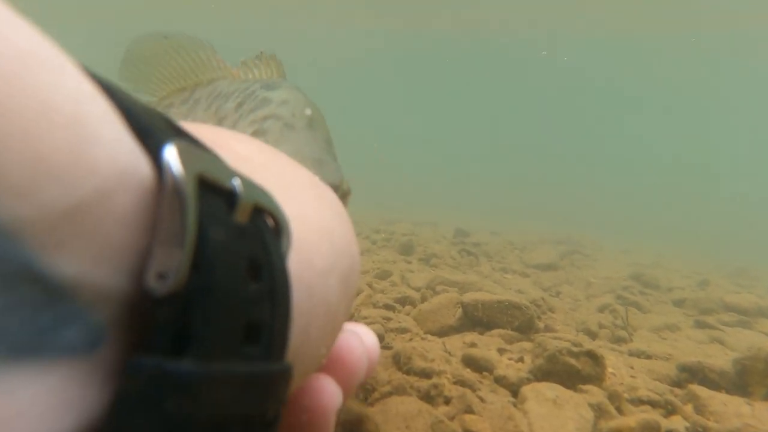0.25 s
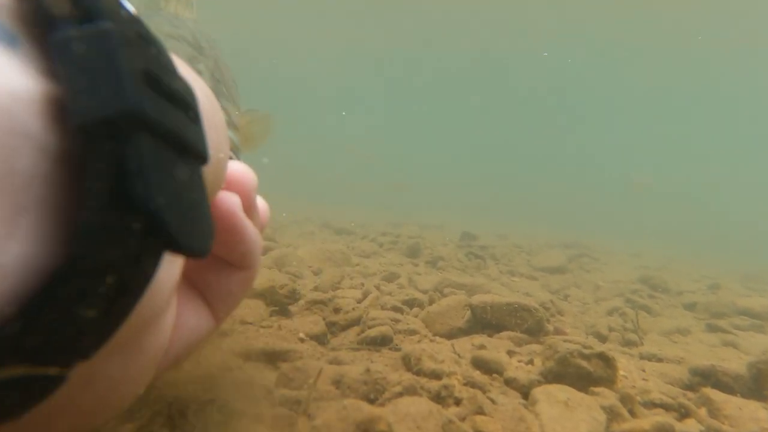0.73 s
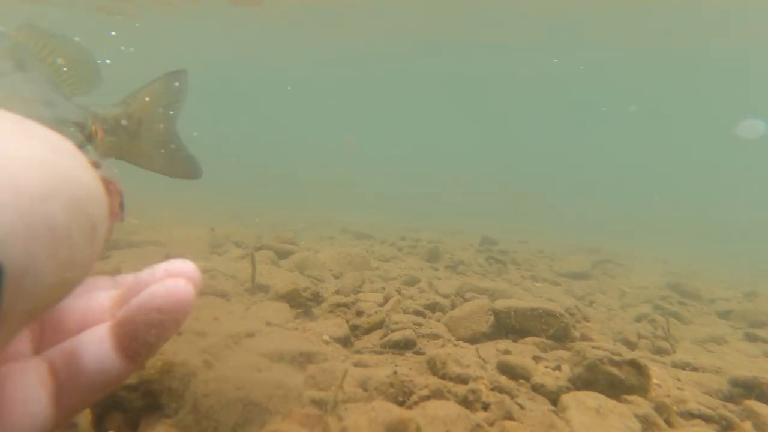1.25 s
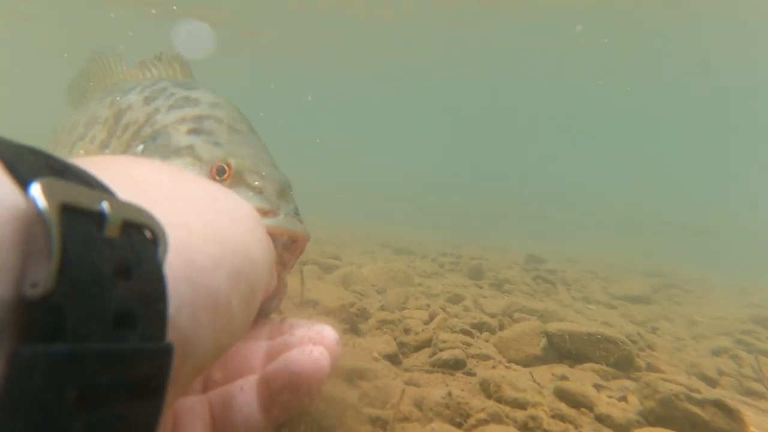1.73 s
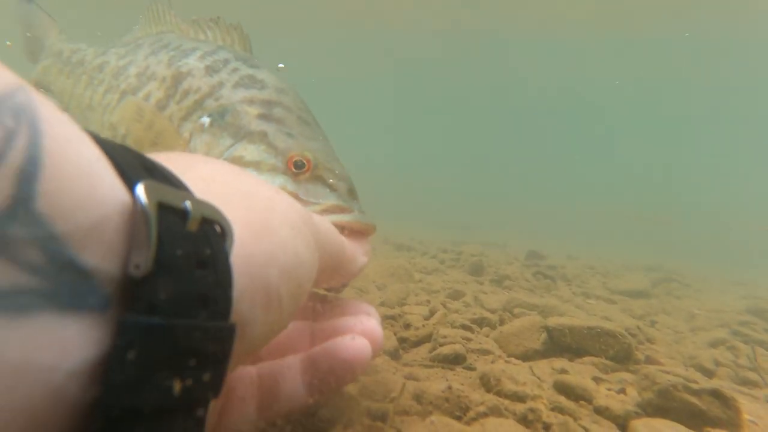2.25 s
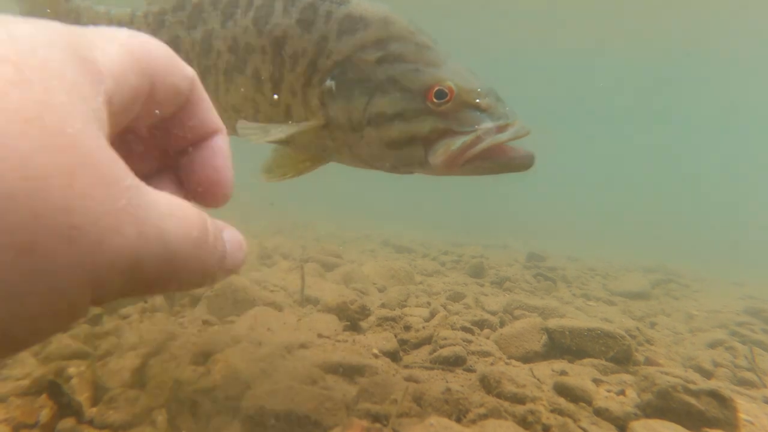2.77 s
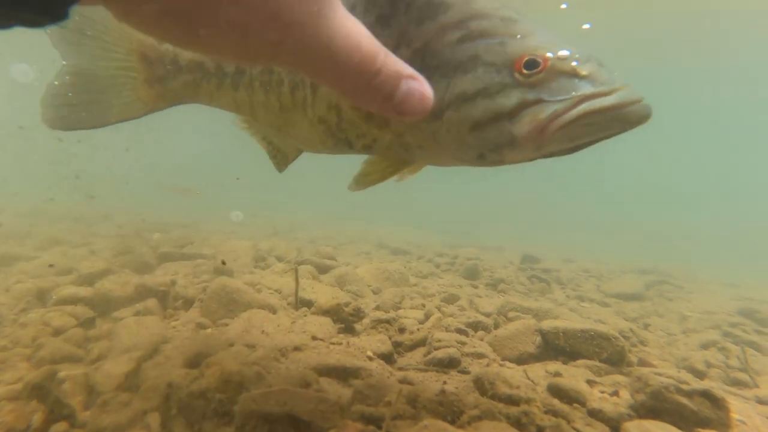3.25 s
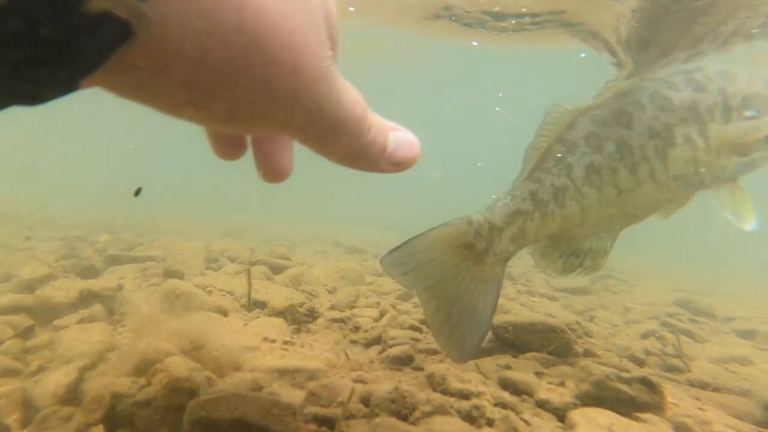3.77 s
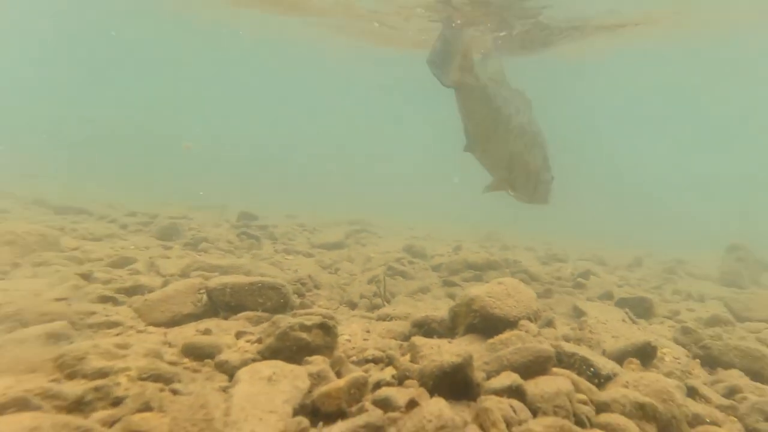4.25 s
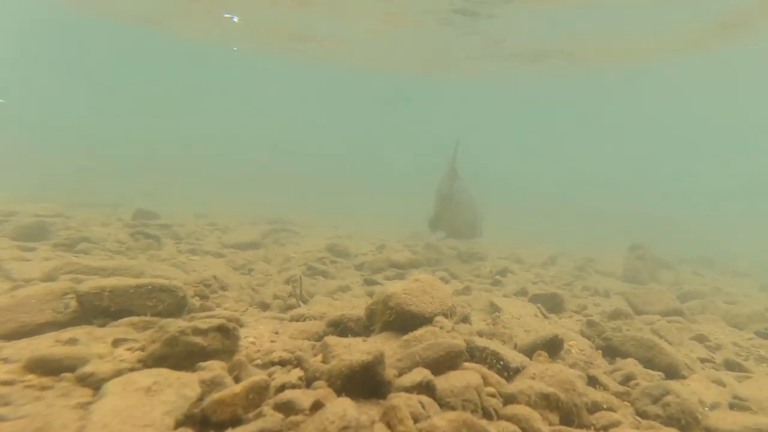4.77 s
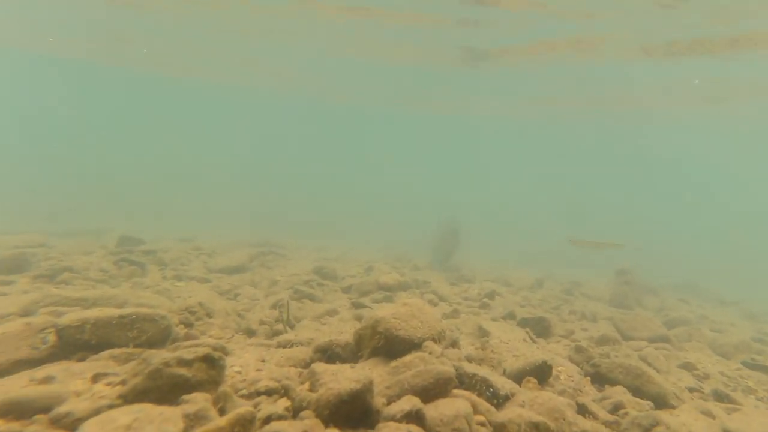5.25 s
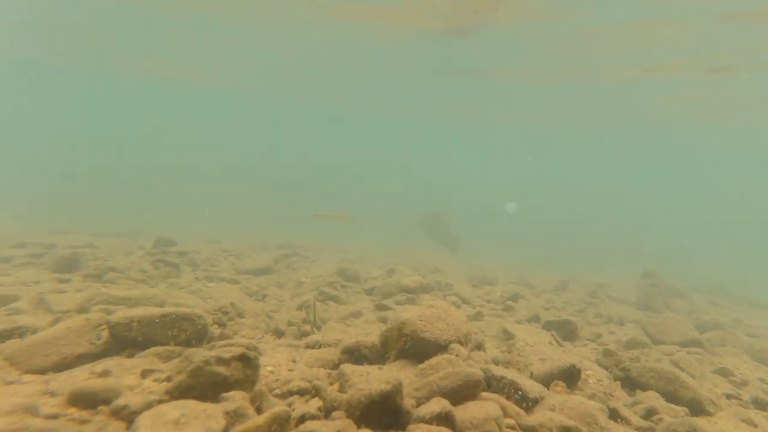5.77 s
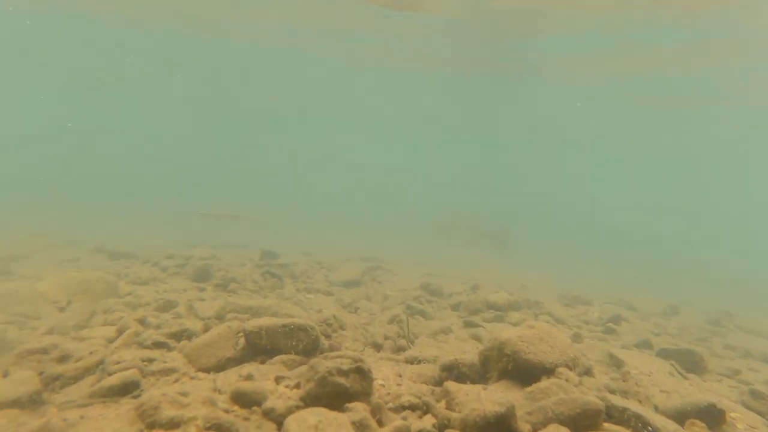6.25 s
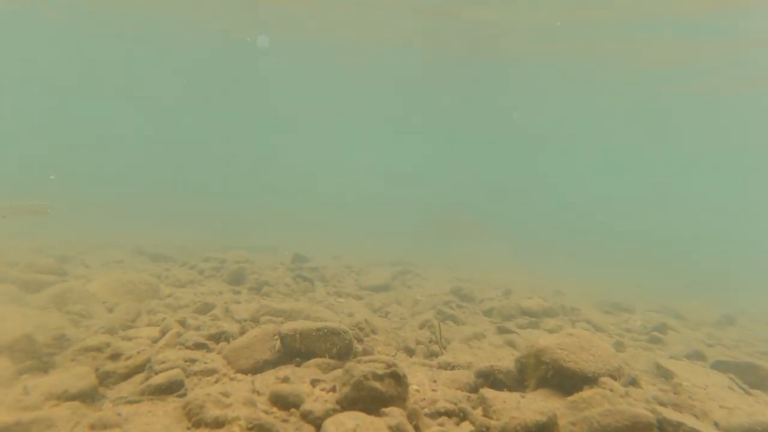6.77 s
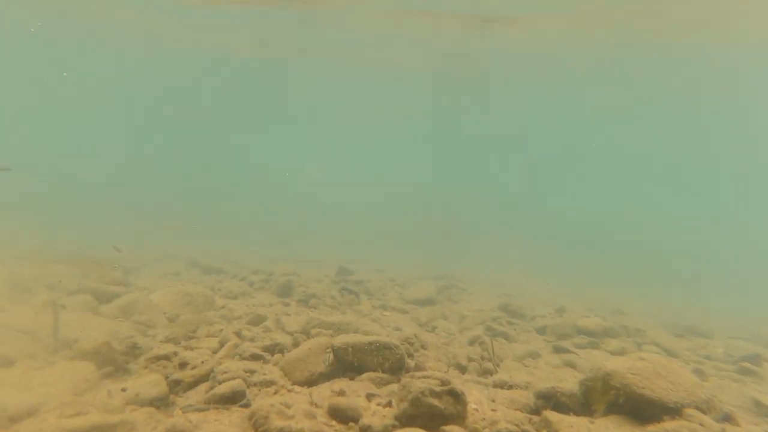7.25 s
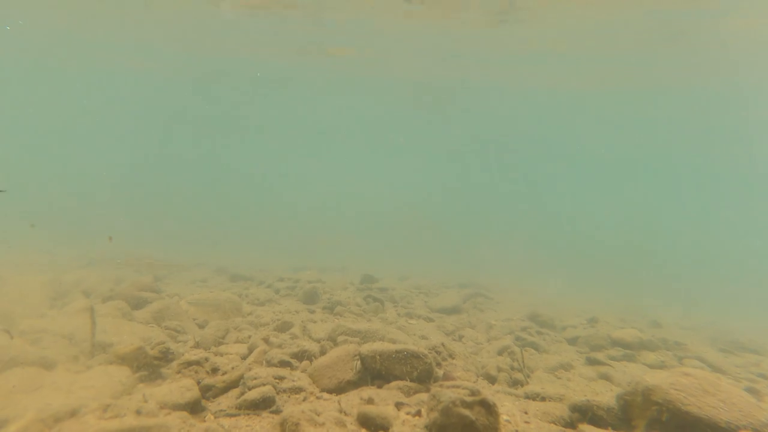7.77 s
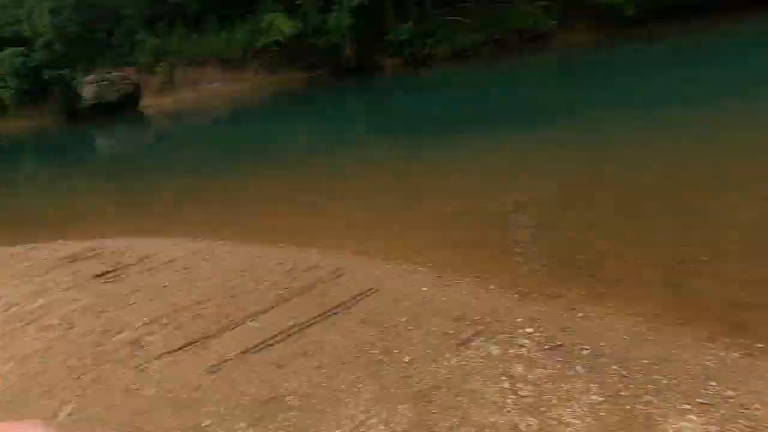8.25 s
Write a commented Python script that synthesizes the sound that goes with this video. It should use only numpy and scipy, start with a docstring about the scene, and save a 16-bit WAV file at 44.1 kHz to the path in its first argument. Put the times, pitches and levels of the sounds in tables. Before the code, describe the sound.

Heard from inside a sealed camera under a shallow river: dull, boxy knocks, gulps and deep sagging glugs over a low current rumble, with little bubble blips and splashes as a hand lets a fish go. The water thins a little, keeps burbling, then stops abruptly. After a brief near-silence comes very soft open-air hiss and a quick cluster of light plastic clacks from a toy water pistol.

```python
"""Eddies, gulps and deep falling glugs of river water knock on a sealed camera as a fish is let go and swims
off. The knocks are pulses, noise and falling tones, muffled by a filter that stands for the camera's housing.
Low noise makes the current rumble, bubbles are short sagging tones, and splashes and grit are bursts of noise.
The underwater scene ends with an abrupt cut. After a short gap comes the open riverbank, a soft hiss of
filtered noise, with a few clacks of a plastic water pistol: bursts of noise and ringing body tones."""
import sys
import numpy as np
from scipy import signal
from scipy.fft import rfft, irfft
from scipy.io import wavfile
from scipy.ndimage import uniform_filter1d, minimum_filter1d

SR = 44100
rng = np.random.default_rng(int(sys.argv[2]) if len(sys.argv) > 2 else 0)


def put_to_file(sound):
    """Save the sound as 16-bit audio at rate SR, in the file named by the first command-line argument."""
    columns = np.atleast_2d(sound).T  # one column per channel
    safe = np.clip(columns, -1, 1)
    whole_steps = np.round(safe * 32767)
    wavfile.write(sys.argv[1], SR, whole_steps.astype(np.int16))


N = 375026
T = np.arange(N) / SR  # time of every sample, in seconds

# what the housing lets through of near blows: pitch_hz [Hz], level_db [dB]
HOUSING = [(60, -5), (120, -4.5), (220, -6.5), (420, -8), (560, -5), (650, -8), (740, -20.5), (1000, -30),
           (1350, -42), (1700, -50.5), (2300, -65), (2900, -75), (3400, -76), (9000, -92)]
# the note on which the housing itself rings most
HOUSING_MODE_HZ, HOUSING_MODE_WIDTH_HZ = 618.6, 17
# surges of water round the housing: start_s [s], length_s [s], churn_db [dB], pressure_swing_db [dB]
SURGES = [(0.032, 0.13, -28, -32), (0.445, 0.18, -25.5, -15.5), (0.552, 0.11, -22, -18),
          (1.029, 0.043, -19.5, -37.5), (1.337, 0.21, -16.5, -14), (1.602, 0.15, -33.5, -17.5),
          (2.297, 0.16, -31.5, -23), (2.97, 0.055, -20, -21.5), (3.104, 0.25, -23, -31),
          (3.51, 0.051, -24.5, -19), (3.658, 0.04, -21.5, -17), (3.877, 0.18, -16.5, -14.5),
          (4.091, 0.43, -20, -15.5), (4.522, 0.23, -21.5, -16.5), (4.887, 0.085, -20, -23),
          (5.062, 0.053, -23, -14), (5.164, 0.066, -21.5, -19.5), (5.948, 0.17, -24.5, -22),
          (6.245, 0.2, -21, -17), (6.802, 0.029, -24.5, -13.5), (7.033, 0.091, -21.5, -14),
          (7.187, 0.037, -22, -31.5), (7.622, 0.031, -22, -14), (7.886, 0.28, -28, -23.5)]


def undb(db):
    """Turn decibels into a gain."""
    return 10 ** (np.asarray(db) / 20)


def unit(x):
    """Scale to an average (rms) strength of 1."""
    return x / np.sqrt(np.mean(x ** 2))


def curve(table):
    """Join the (time, value) points of a table with straight lines, one value per sample."""
    return np.interp(T, *np.transpose(table))


def colour(x, points, bass_db=0, size=4096):
    """Filter sound through (Hz, dB) points without any echo ahead of it; bass_db lifts or cuts the bass."""
    point_hz, point_db = np.transpose(points)
    hz = np.maximum(np.arange(size // 2 + 1) * SR / size, 1)
    bass_shelf_db = bass_db / (1 + (hz / 400) ** 4)
    gain = undb(np.interp(np.log(hz), np.log(point_hz), point_db) + bass_shelf_db)
    # folding the cepstrum gives a minimum-phase filter, which answers as early as it can
    cepstrum = irfft(np.log(gain))
    cepstrum[1:size // 2] *= 2
    cepstrum[size // 2 + 1:] = 0
    response = irfft(np.exp(rfft(cepstrum)))
    return signal.fftconvolve(x, response)[:len(x)]


def band(x, hz, width_hz):
    """Pass sound through one resonance."""
    return signal.lfilter(*signal.iirpeak(hz, hz / width_hz, fs=SR), x)


def housing_mode(x):
    """The housing's main note, as rung by x."""
    return band(x, HOUSING_MODE_HZ, HOUSING_MODE_WIDTH_HZ)


def soften(x, top_hz):
    """Gently take away the treble above top_hz."""
    return signal.sosfilt(signal.butter(2, top_hz, fs=SR, output="sos"), x)


def walk(rate):
    """Wander at random with a spread near 1, through `rate` new values a second."""
    knots = rng.standard_normal(4096)
    return 1.12 * np.interp(T * rate, np.arange(len(knots)), knots)


def pulses(rate, spread_db):
    """Random pressure pulses, about `rate` a second, of either sign and uneven size."""
    happens = rng.random(N) < rate / SR
    sign = rng.choice([-1, 1], N)
    size_db = spread_db * np.clip(rng.standard_normal(N), -2, 2)
    return happens * sign * undb(size_db)


def add(out, s, x):
    """Mix x in from time s."""
    i = max(int(s * SR), 0)
    out[i:i + len(x)] += x[:max(N - i, 0)]


def centred_time(size, share_before):
    """Times in seconds for one short event, with 0 at its heart."""
    return (np.arange(size) - size // share_before) / SR


def decay(t, t60):
    """Die away by 60 dB in t60 seconds."""
    return np.exp(-np.log(1000) * t / t60)


def surges(levels_db, attack_s, release_s):
    """Summed power of the surges: each rises, holds and dies away."""
    power = np.zeros(N)
    for (start, length, _, _), db in zip(SURGES, levels_db):
        rise = np.clip((T - start) / attack_s + .5, 0, 1)
        fall = np.exp(-np.clip((T - start - length) / release_s + .5, 0, 20))
        power += (undb(db) * rise * fall) ** 2
    return power


def churning():
    """How hard the water churns, in dB: surges on top of the calm current, never quite even."""
    # the current between surges: time_s [s], level_db [dB]
    calm = [(0, -27.5), (.8, -31.5), (1.25, -31.5), (2.1, -25), (2.8, -30.5), (3.8, -32), (4.7, -28),
            (5.6, -32), (6.3, -24), (6.7, -30), (7.5, -32.5), (8, -35.5)]
    surge_levels_db = [churn_db for _, _, churn_db, _ in SURGES]
    power = undb(curve(calm)) ** 2 + surges(surge_levels_db, attack_s=0.03, release_s=0.069)
    wander_db = 1.1 * walk(rate=18)
    return 10 * np.log10(power) + wander_db


def falling_tone(t, octave_s, tail_s):
    """Opening water builds near the housing's note, then each cycle is longer than the last, down into the bass."""
    heart_hz, rise_s, hiss_db = 451.5, .004, -10
    pitch_spread = .12  # tones differ a little in pitch
    stretch = np.maximum(1 + t / octave_s, heart_hz / HOUSING_MODE_HZ)  # 2 is one octave down
    hz = heart_hz * np.exp(pitch_spread * rng.uniform(-1, 1)) / stretch
    swell = np.exp(-np.where(t < 0, -t / rise_s, t / tail_s)) / np.maximum(stretch, 1) ** 0.45
    tone = np.sin(2 * np.pi * (np.cumsum(hz) / SR + rng.random()))
    hiss = unit(colour(rng.standard_normal(len(t)), HOUSING)) * undb(hiss_db) / stretch
    end_fade = np.minimum(2 * (1 - t / t[-1]), 1)
    return colour((tone + hiss) * swell * end_fade, HOUSING)


def burble(count=4, size=4096):
    """Small glugs at random moments, some falling quickly and some slowly."""
    t = centred_time(size, share_before=4)
    total = np.zeros(N)
    for octave_s in np.geomspace(.003, .01, count):
        glug = falling_tone(t, octave_s, tail_s=0.016)
        total += signal.fftconvolve(pulses(rate=18, spread_db=2.5), glug, "same")
    return unit(total)


def current(churn_db):
    """Slow pressure swings rock the housing; eddies patter and glug on it over the wash of the river."""
    # colour of the current's rumble: pitch_hz [Hz], level_db [dB]
    rumble_colour = [(8, -1), (22, 3.5), (45, 1), (59, 11), (75, 3.5), (110, 1.5), (180, -14.5), (400, -68)]
    # what the housing lets through of the river's far wash: pitch_hz [Hz], level_db [dB]
    wash_colour = [(120, -8.5), (220, -9.5), (400, -11.5), (570, -1), (650, -6.5), (740, -16.5),
                   (1050, -27), (1350, -45.5), (1700, -38), (2200, -47.5), (2850, -64.5), (3300, -66),
                   (6000, -94.5), (14000, -90.5)]
    # how each layer grows with the churn: dB per dB of churn, then an offset in dB
    eddy_law, wash_law = (1.079, 0.24), (0.47, -20.5)
    calm_swing_db, rumble_db, burble_db = -23, -4.5, -3

    swing_levels_db = [swing_db for _, _, _, swing_db in SURGES]
    swing_power = surges(swing_levels_db, attack_s=0.028, release_s=0.056)
    swing = np.sqrt(undb(calm_swing_db) ** 2 + swing_power)
    rumble = unit(colour(rng.standard_normal(N), rumble_colour)) * swing * undb(rumble_db)

    patter = pulses(rate=900, spread_db=3.5) * undb(2.2 * walk(70))
    eddies = unit(colour(patter, HOUSING)) + undb(burble_db) * burble()

    # the far wash swells less than the eddies close by, and keeps the housing's main mode ringing
    wash = unit(colour(rng.standard_normal(N) * undb(3.4 * walk(35)), wash_colour, bass_db=-4.0))
    wash = wash + undb(-1.0) * housing_mode(wash)

    eddies = eddies * undb(np.polyval(eddy_law, churn_db))
    wash = wash * undb(np.polyval(wash_law, churn_db))
    return soften(rumble + eddies + wash, top_hz=3630)


def bubble(hz, t60, sharp):
    """One bubble rings, starting sharp and sagging as it settles."""
    t = T[:int(2 * t60 * SR)]
    phase = 2 * np.pi * np.cumsum(hz * (1 + sharp * np.exp(-t / 0.008))) / SR
    attack = (1 - np.exp(-t / 0.00097)) ** 2
    return np.sin(phase) * attack * decay(t, t60)


def bubbles(churn_db, count=900):
    """Single bubbles and clouds of `count` a second ring; crowds of tiny ones fizz behind as the water churns."""
    # colour of the fizz: pitch_hz [Hz], level_db [dB]
    fizz_colour = [(700, -24), (1100, 2.5), (1380, 4.5), (1700, -14), (2100, -21.5), (2700, -26.5),
                   (3300, -39.5), (6000, -69)]
    # the tiniest bubbles, before a 2 dB cut: time_s [s], level_db [dB]
    sizzle_level = [(0, -66.5), (1.1, -89), (1.8, -83), (2.1, -67), (2.45, -80), (3.8, -77.5), (4.4, -65),
                    (5.15, -66.5), (5.5, -75), (6.15, -66.5), (6.7, -79), (8, -76.5)]
    # their colour: pitch_hz [Hz], level_db [dB]
    sizzle_colour = [(1400, -23), (2000, -4), (2850, 0.5), (3300, -22.5), (4500, -18.5), (6000, -35.5)]
    # single bubbles, level before attack and decay: start_s [s], level_db [dB], settled pitch_hz [Hz],
    # t60_s (time to die by 60 dB) [s], starting sharpness [share of the pitch]
    single_bubbles = [(0.535, -20, 1140, 0.0039, .16), (1.761, -10, 1010, 0.0095, 0.1),
                      (1.907, -22.5, 1280, 0.021, .044), (2.021, -12.5, 1270, 0.013, 0.041),
                      (2.159, -11.5, 1290, 0.014, .05), (2.194, -13, 1090, 0.015, 0.058),
                      (2.338, -14.5, 1295, 0.03, .03), (3.391, -29, 1443, 0.054, 0.035),
                      (3.399, -24, 1337, 0.02, 0.1), (3.404, -3, 1094, 0.03, 0.092),
                      (3.415, -22.5, 1053, 0.11, .04), (3.410, -27.5, 2500, 0.022, 0.017),
                      (3.431, -45, 2580, 0.018, .02), (3.474, -18.5, 995, 0.15, 0.0054),
                      (3.49, -25.5, 1370, 0.038, .02), (3.491, -35, 1760, 0.029, 0.016),
                      (3.505, -50, 2510, .04, .018), (3.505, -23.5, 1006, .04, .01),
                      (5.318, -23, 1390, 0.014, 0.089), (5.319, -28, 2560, 0.0066, .08),
                      (5.667, -29, 1400, 0.011, .03), (5.669, -28, 2430, 0.0073, .08)]
    # clouds shaken loose, whose bubbles are 4.6 to 13.8 dB above the level:
    # start_s [s], end_s [s], level_db [dB]
    clouds = [(1.37, 1.5, -39), (1.88, 1.925, -28.5), (1.95, 2.2, -35), (2.3, 2.44, -45)]
    cloud_low_hz, cloud_high_hz = 1015, 1350
    fizz_law = (0.58, -39)  # dB per dB of churn, offset in dB

    fizz_db = np.polyval(fizz_law, churn_db) + 1.5 * walk(rate=57)
    out = unit(colour(pulses(rate=530, spread_db=4.0), fizz_colour)) * undb(fizz_db)
    sizzle = unit(colour(pulses(rate=420, spread_db=4.5), sizzle_colour))
    out += sizzle * undb(curve(sizzle_level) - 2.0)
    for s, db, hz, t60, sharp in single_bubbles:
        add(out, s, undb(db) * bubble(hz, t60, sharp))
    for start, end, db in clouds:
        for when, pitch, strength in rng.random((int(count * (end - start)), 3)):
            hz = cloud_low_hz + pitch * (cloud_high_hz - cloud_low_hz)
            ping = bubble(hz, t60=0.007, sharp=0.035)
            add(out, start + when * (end - start), ping * undb(db + 9.2 * (strength + 0.5)))
    return out


def gulps(size=4096):
    """Each gulp is a slap and falling tone, as its pocket of water opens, inside a swell of smaller pulses."""
    # gulps against the housing, level before a 12 dB cut:
    # time_s [s], level_db [dB], length_s [s], bass_db [dB]
    gulp_events = [(.025, -13, .007, 4), (.125, -12, 0.015, 6.5), (.273, -18.5, 0.0055, -4),
                   (.324, -13, 0.0041, 1), (.379, -7, 0.0096, 6.5), (.546, -8, 0.014, 2),
                   (.614, -14, 0.015, 6), (.67, -11, .0058, 10), (.736, -11.5, 0.0034, 4.5),
                   (.797, -20, 0.0024, 6), (.981, -13, 0.0097, 14), (1.033, -15, 0.0054, 2),
                   (1.202, -9, 0.0096, -5), (1.239, -19, 0.0058, 6), (1.385, -11, 0.01, -5),
                   (1.523, -9, .0071, 8.5), (1.687, -8, 0.018, 2), (1.772, -7, 0.019, 12.5),
                   (2.138, -15.5, 0.003, 4), (2.254, -8, 0.006, 4.5), (2.307, -11.5, .0076, 5),
                   (2.328, -16, .006, 10), (2.39, -15.5, 0.014, -6), (2.555, -9.5, 0.009, 0.5),
                   (2.94, -17.5, 0.0074, 1), (3.009, -12, 0.0048, -3), (3.041, -14.5, 0.0063, 3),
                   (3.112, -16, 0.0074, 7), (3.16, -15.5, 0.0078, 24), (3.18, -7.5, 0.0062, 13),
                   (3.253, -10, 0.0069, 10), (3.314, -11, 0.0054, 2.5), (3.331, -10.5, 0.0066, 14),
                   (3.408, -9.5, 0.0035, 1), (3.623, -12, 0.0055, 8), (3.651, -11, 0.0044, -2),
                   (3.685, -10.5, 0.0022, 6.5), (3.714, -3.5, 0.013, 2), (3.92, -13, .013, 0.5),
                   (3.966, -11, 0.011, 8), (4.029, -14.5, 0.0073, -2), (4.055, -9, 0.0069, 4),
                   (4.18, -13, 0.0061, 1.5), (4.247, -11, 0.0061, 0), (4.345, -13.5, 0.0076, -10),
                   (4.548, -9, 0.018, 5), (4.735, -12.5, 0.024, 2.5), (4.943, -15.5, 0.0067, 10),
                   (4.967, -16.5, 0.0039, -6), (5.214, -23, .01, 0), (5.74, -20, 0.0031, -13),
                   (5.936, -14.5, 0.0076, -1), (6.045, -20.5, 0.006, -11), (6.243, -14, 0.012, -11),
                   (6.272, -13.5, 0.0055, -15), (6.349, -12.5, 0.012, -4.5), (6.433, -9, .0063, -4),
                   (6.488, -12.5, 0.0051, 7), (6.522, -9.5, 0.0073, -4), (6.647, -12, 0.012, -10.5),
                   (6.702, -17.5, 0.0059, -4), (6.769, -19.5, 0.011, -25), (7, -17, 0.014, -14),
                   (7.049, -10, 0.0083, 2), (7.08, -10, 0.019, -1), (7.248, -11.5, 0.011, -4),
                   (7.269, -14.5, 0.0064, 2), (7.327, -15.5, 0.0037, -7), (7.54, -17, 0.018, -6),
                   (7.659, -11.5, 0.014, -1.5), (7.939, -10, 0.0062, -9.5), (8, -17.5, .004, -6.5)]
    fall_share, slap_share, ring_db = 0.56, .55, -1.5
    out, t = np.zeros(N), centred_time(size, share_before=4)
    fade = np.clip((t[-1] - t) / .02, 0, 1) ** 2
    for s, db, length, bass_db in gulp_events:
        envelope = np.exp(-np.where(t < 0, (t / (1.1 * length)) ** 2, t / (0.9 * length)))
        swell = rng.standard_normal(size) * envelope
        fall = falling_tone(t, octave_s=0.9 * length, tail_s=0.72 * length)
        push = swell / np.linalg.norm(swell)
        push[size // 4] += slap_share * rng.choice([-1, 1])  # the slap at its heart
        knock = colour(push, HOUSING, bass_db=bass_db)
        knock = knock + undb(ring_db) * housing_mode(knock)
        # a gulp with little bass is mostly knock and has little falling tone
        gulp = unit(knock) + fall_share * undb(min(bass_db, 0)) * unit(fall)
        add(out, s + t[0] - .0025, unit(gulp * fade) * undb(db - 12.0))
    return out


def bursts(events, points, size=4096):
    """Short swells of tiny impacts, made of spiky (cubed) noise that builds and dies away."""
    out, t = np.zeros(N), centred_time(size, share_before=4)
    for s, db, length in events:
        swell = np.exp(-np.where(t < 0, (t / length) ** 2, t / length))
        burst = colour(rng.standard_normal(size) ** 3 * swell, points)
        add(out, s + t[0], undb(db) * burst / np.abs(burst).max())
    return out


def grit():
    """Grit brushes the housing in faint bursts of tiny impacts."""
    # brushes of grit: time_s [s], peak_db [dB], length_s [s]
    brushes = [(.322, -62, .005), (.38, -57.5, 0.01), (.539, -60, .0056), (.735, -56, 0.0035),
               (.826, -55, 0.0082), (1.381, -58.5, .008), (1.5, -55.5, .012), (1.56, -53, .005),
               (1.69, -53.5, .008), (2.253, -56, .005), (3.33, -50.5, .007), (3.682, -51.5, .004),
               (3.712, -52, .0033), (3.756, -56, .007), (4.246, -57, 0.0038), (4.282, -55, .0074),
               (4.368, -54.5, .0089), (6.52, -55, .005), (6.836, -51.5, .0083), (7.265, -60, 0.0036)]
    # their colour: pitch_hz [Hz], level_db [dB]
    grit_colour = [(800, -10), (1500, 0.5), (2600, 3.5), (4300, -4.5), (6500, -13.5), (10000, -18),
                   (15000, -30.5)]
    return bursts(brushes, grit_colour)


def glugs(size=6144):
    """Deep glugs, pockets of water that open wide: each is one long falling tone."""
    # time_s [s], peak_db [dB], octave_s (time to fall an octave) [s], tail_s [s]
    glug_events = [(.398, -6.5, .006, .016), (.823, -8.5, 0.013, 0.013), (1.202, -6, 0.0063, .03),
                   (1.565, -8, 0.0066, .016), (1.744, -12.5, 0.0037, 0.035), (1.866, -11, 0.0087, 0.013),
                   (2.398, -10.5, 0.0052, 0.045), (2.626, -9.5, 0.0048, .018), (2.99, -9.5, 0.0026, 0.047),
                   (3.752, -7.5, 0.0064, 0.011), (3.903, -10.5, 0.0065, 0.06), (4.08, -8, 0.0034, 0.073),
                   (4.284, -6.5, 0.0027, .015), (4.35, -14, 0.0052, .035), (4.612, -8, 0.0039, 0.036),
                   (4.703, -12, 0.014, 0.11), (5.945, -9.5, .006, .05), (6.834, -8, 0.0034, 0.036),
                   (7.943, -19, 0.0055, .045)]
    out, t = np.zeros(N), centred_time(size, share_before=6)
    for s, db, octave_s, tail_s in glug_events:
        tone = falling_tone(t, octave_s, tail_s)
        add(out, s + t[0] - .001, undb(db) * tone / np.abs(tone).max())
    return out


def splashes():
    """Sharp little splashes, each a burst of noise for bubbles torn off at once."""
    # time_s [s], peak_db [dB], length_s [s]
    splash_events = [(.537, -24, 0.0018), (.615, -41.5, 0.0093), (1.437, -26, 0.01), (1.56, -43.5, 0.0037),
                     (2.022, -29.5, 0.0018), (2.138, -35, 0.0019), (2.161, -25.5, 0.0012),
                     (2.39, -30, 0.0028), (2.623, -30, 0.0039), (3.404, -19.5, .002),
                     (3.623, -27.5, 0.0041), (3.682, -21, 0.0023), (3.861, -29, 0.0044),
                     (3.904, -35.5, 0.0061), (4.035, -25, .004), (4.245, -24, 0.003),
                     (4.282, -28.5, 0.0024), (4.54, -33, 0.011), (4.705, -34, 0.0083), (4.737, -30, 0.0026),
                     (4.912, -33.5, .008), (4.962, -38, .003), (5.943, -25.5, 0.0029),
                     (6.041, -37.5, 0.0043), (6.268, -26, 0.0031), (6.393, -27.5, .004),
                     (6.423, -35.5, 0.0032), (7.24, -29, 0.0045), (7.997, -32.5, .003)]
    # their colour: pitch_hz [Hz], level_db [dB]
    splash_colour = [(400, -19), (900, 9.5), (1350, 4.5), (1800, -8), (2400, -19), (3000, -29),
                     (5000, -55.5)]
    return bursts(splash_events, splash_colour)


def riverbank():
    """Soft open-air hiss fades in; each clack of the pistol rings the body modes near its own pitch."""
    # colour of the open air: pitch_hz [Hz], level_db [dB]
    air_colour = [(40, 3), (120, -3), (280, 3), (1500, -9), (3000, -17), (5300, -18), (7500, -32),
                  (10000, -39), (14000, -53.5)]
    # modes of the pistol's hollow body: pitch_hz [Hz], level_db [dB], t60_s (time to die by 60 dB) [s]
    pistol_modes = [(305, -0.5, 0.11), (850, -18, 0.2), (1144, -11, .07), (2010, -6, 0.043),
                    (2450, -13, 0.051), (2900, -19, 0.032), (3460, -9, 0.034), (3820, -11, 0.041)]
    # plastic clacks: start_s [s], peak_db [dB], centre_hz [Hz], width_hz [Hz], t60_s [s]
    clacks = [(8.374, -40, 3380, 700, 0.038), (8.416, -45, 1970, 500, .17), (8.431, -25, 1600, 1000, 0.068),
              (8.425, -42, 3780, 1500, 0.29), (8.443, -24.5, 3820, 2750, 0.037),
              (8.458, -26, 603, 820, 0.25), (8.46, -47, 6000, 6000, 0.12), (8.479, -34.5, 2600, 1800, 0.24),
              (8.497, -37, 5470, 3500, .04)]

    fade_in = np.clip((T - 8.25) / 0.051, 0, 1) ** 2
    out = unit(colour(rng.standard_normal(N), air_colour)) * undb(-52.5) * fade_in
    t = T[:SR // 4]
    ring = sum(undb(db) * np.sin(2 * np.pi * hz * t) * decay(t, t60) for hz, db, t60 in pistol_modes)
    attack = 1 - np.exp(-t / 0.00026)
    for s, db, hz, width_hz, t60 in clacks:
        crack = rng.standard_normal(len(t)) * decay(t, t60)
        clack = band((crack + ring) * attack, hz, width_hz)
        clack = soften(band(clack, hz, width_hz), top_hz=12400)
        add(out, s, undb(db) * clack / np.abs(clack).max())
    return out


def scene():
    """Under water first, then on the bank."""
    submerged = T < 8.043  # seconds
    churn_db = churning()
    water = current(churn_db) + bubbles(churn_db) + gulps() + grit() + glugs() + splashes()
    return (water * submerged + riverbank())[None]


def record(dry):
    """The camera's limiter eases down the hardest knocks; then it cuts the top."""
    limit_peak, limit_s, top_hz = .85, .006, 15600
    size = int(limit_s * SR)
    gain = limit_peak / np.maximum(np.abs(dry), limit_peak)
    gain = minimum_filter1d(gain, 2 * size)
    gain = uniform_filter1d(uniform_filter1d(gain, size), size)  # smooth the dips
    return signal.sosfilt(signal.ellip(8, .2, 70, top_hz, fs=SR, output="sos"), dry * gain)


dry = scene()
out = record(dry)
put_to_file(out)
```